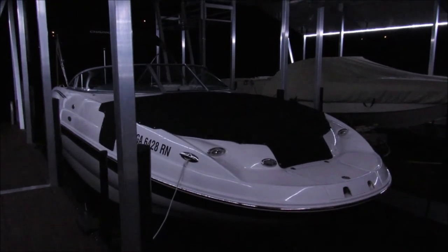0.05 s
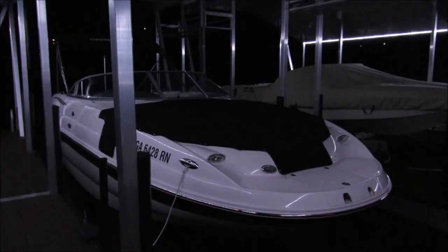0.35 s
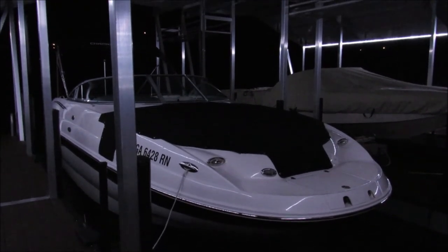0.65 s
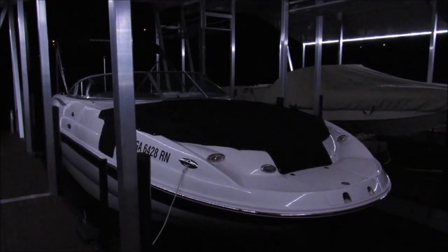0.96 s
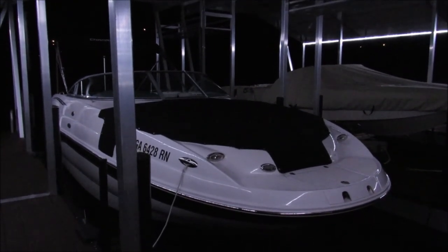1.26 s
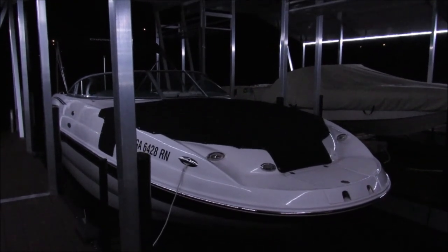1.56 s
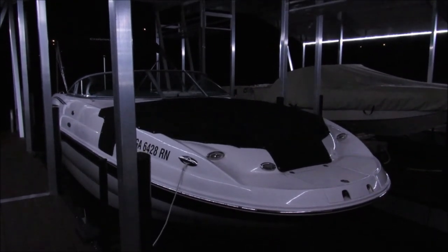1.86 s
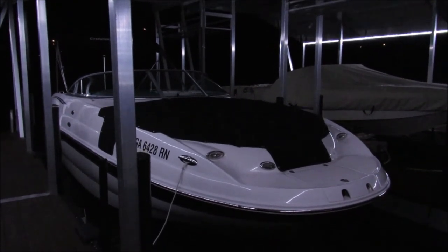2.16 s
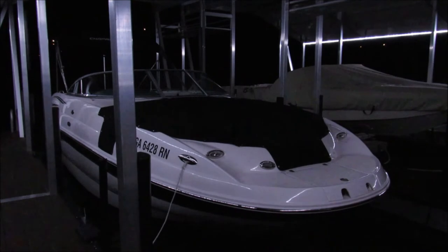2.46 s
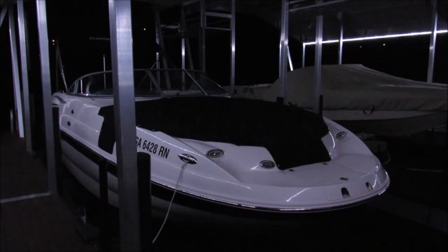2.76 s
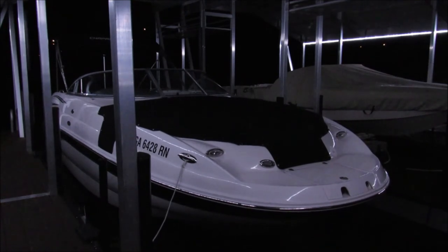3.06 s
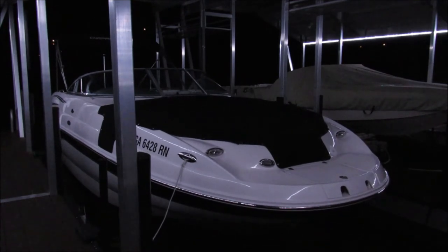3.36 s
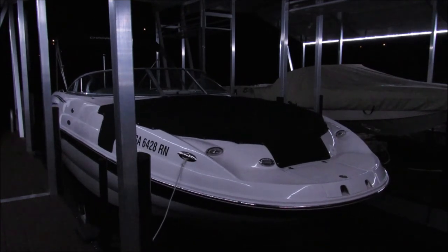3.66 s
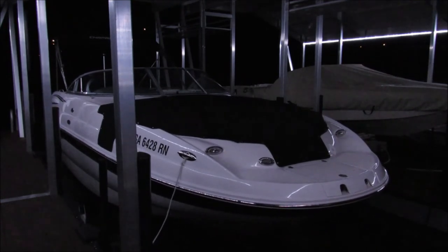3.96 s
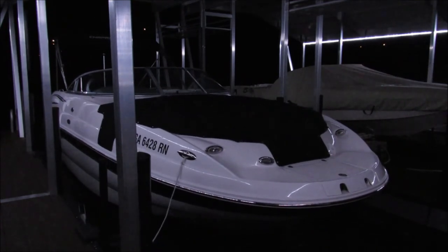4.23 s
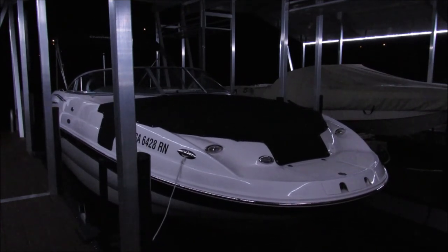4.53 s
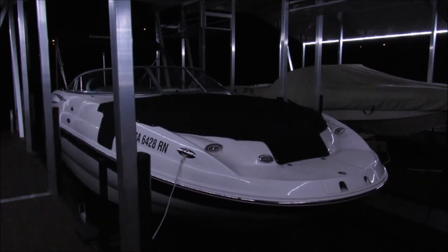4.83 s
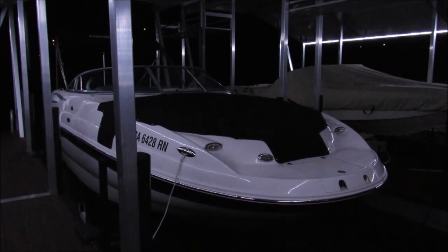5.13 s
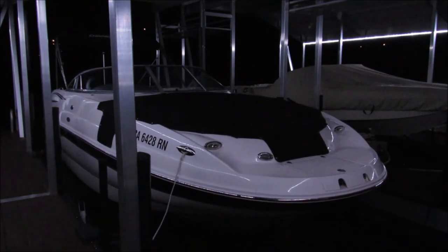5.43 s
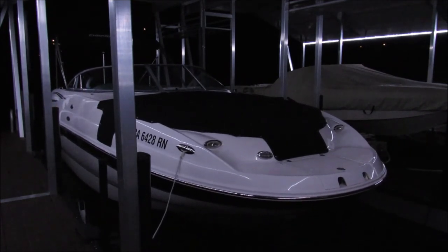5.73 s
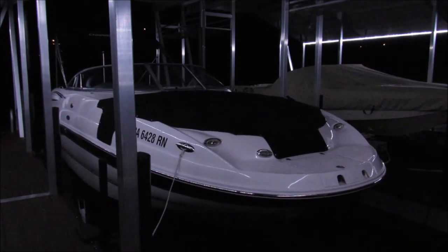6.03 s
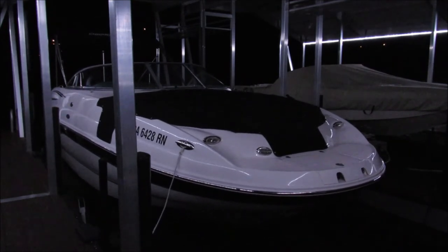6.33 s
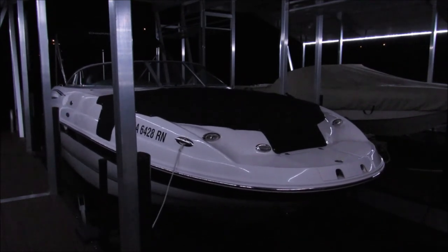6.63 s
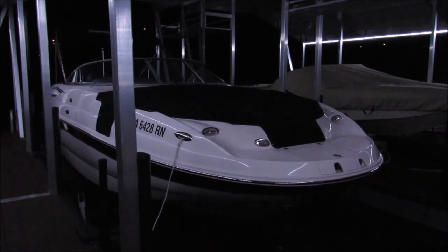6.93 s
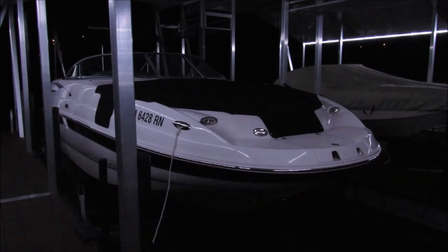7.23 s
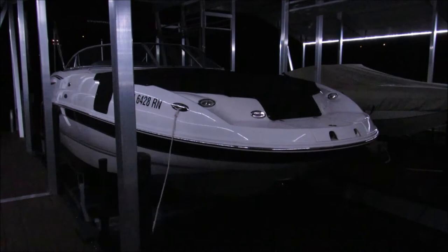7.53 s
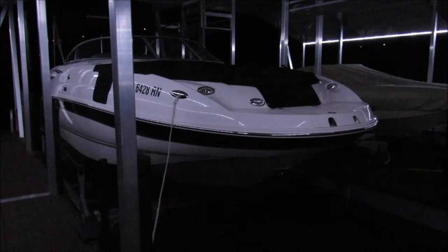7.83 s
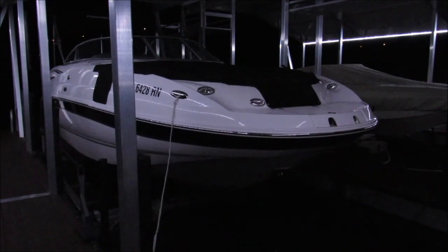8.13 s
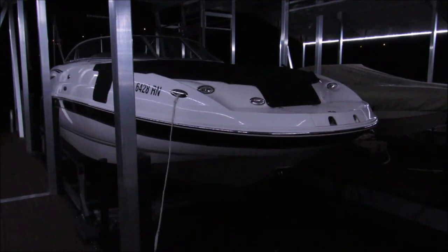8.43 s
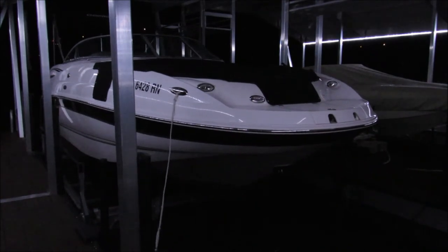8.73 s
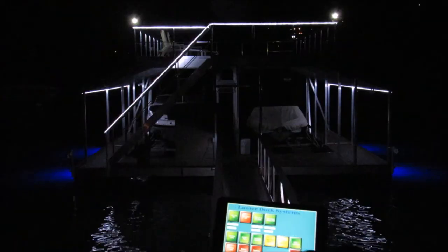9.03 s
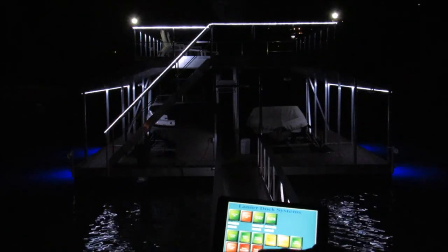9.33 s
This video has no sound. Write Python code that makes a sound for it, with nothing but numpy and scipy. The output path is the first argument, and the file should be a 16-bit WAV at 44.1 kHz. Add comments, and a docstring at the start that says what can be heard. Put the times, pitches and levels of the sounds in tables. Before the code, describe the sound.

Loud, steady rushing air and a fan whine from a boat lift blower, with late wind thumps and dripping water before a sudden stop.

```python
"""A loud drone and hiss of air, with a whining fan and a mains hum: an electric blower is filling the
tanks of a boat lift in a covered dock at night. The air drones in the pipe and hisses from the housing.
Wind starts to buffet the microphone, water slops off the rising hull, and the fan slows as the boat
comes up. Then the sound cuts off abruptly and only quiet lakeside air is left."""
import sys
import numpy as np
from scipy import signal
from scipy.fft import rfft, irfft, next_fast_len
from scipy.io import wavfile
from scipy.ndimage import map_coordinates

SR = 44100
rng = np.random.default_rng(int(sys.argv[2]) if len(sys.argv) > 2 else 0)


def generate_wav(signal):
    """Clip the signal to [-1, 1] and save it as 16-bit WAV at the path in sys.argv[1]."""
    frames = np.transpose(np.atleast_2d(signal))
    scaled = np.clip(frames, -1, 1) * 32767
    pcm = np.round(scaled).astype(np.int16)
    wavfile.write(sys.argv[1], SR, pcm)


N = 418068
RISE_AT_S, RISE_S = 7.68, .33  # the hull leaves the water: middle and time scale of its rise
TOP_HZ = 15760  # upper edge of the whole sound

# The blower stands a little to one side. Each row: frequency in Hz, left minus right level in dB.
BALANCE = [(60, -1), (110, -1), (200, -0.5), (380, 4.0), (700, 1.0), (1290, 1.0), (2380, -0.5),
           (4400, -1.0), (8120, -0.5), (15000, 0)]
# Each row: frequency in Hz, how far the left side runs ahead in radians.
LEFT_LEAD = [(400, -.3), (700, -0.23), (1900, -.36), (5000, -.28), (7000, -0.13), (8500, 0.056)]
def blower():
    """Air, fan and motor together, reaching left and right with slightly different level and timing."""
    def placement(f):
        gain = amp(stereo(0, along(BALANCE, f) / 2))
        return gain * np.exp(1j * stereo(0, along(LEFT_LEAD, f) / 2))
    return filtered(rushing_air() + fan_whine() + motor_hum(), placement)


# Low, middle and upper drone, then hiss. Each row: level in dB, drift in dB per second,
# change in dB as the hull rises, flutter in dB.
AIR_LEVELS = [(-34, -0.0333, 1, 0.64), (-31, -0.303, -2.6, 1), (-38.5, -0.0657, 0.5, 0.5),
              (-36, 0.0422, 0.6, 0.42)]
def rushing_air():
    """The drone and hiss flutter, and their levels shift as the tanks fill and the hull rises."""
    t, rise = np.arange(N) / SR, smooth_step(RISE_AT_S, RISE_S)
    *drone_db, hiss_db = [db + drift * t + change * rise + flutter * wobble(55)
                          for db, drift, change, flutter in AIR_LEVELS]
    return pipe_drone(drone_db) + housing_hiss(hiss_db)


# Swirling air before the pipe shapes it. Each row: frequency in Hz, relative level in dB.
DRONE_COLOUR = [(25, -36), (55, -30.5), (125, -33), (215, -16.5), (410, -18.5), (500, 0.5), (1100, -9.5),
                (1220, -13), (2200, -18.5), (2600, -21), (2850, -29), (5000, -91.5)]
# Where the air in the pipe and tanks rings. Each row: pitch in Hz, half width in Hz, boost in dB.
PIPE_RINGS = [(250, 14, 3), (355, 35, 5), (470, 16, 3), (523, 14, 3), (563, 13, 3), (672, 24, 8),
              (744, 32, 13), (816, 18, 11), (862, 30, 11.5), (965, 50, 12.5), (1048, 30, 11),
              (1108, 50, 15), (1350, 55, 8), (1432, 42, 10), (1500, 12, 6), (1635, 55, 4), (1858, 56, 15),
              (1984, 40, 10), (2145, 48, 8), (2222, 28, 7.5), (2416, 38, 7), (2550, 24, 6)]
# Narrow dips and ridges between the rings. Each row: pitch in Hz, half width in Hz, change in dB.
PIPE_RIPPLES = [(785, 5.7, 9), (894, 10, -3.5), (1095, 11, -5.5), (1195, 10, 0.5), (1580, 19, -2),
                (2044, 9.9, 6)]
def pipe_drone(levels_db, low_hz=795, upper_hz=1200, sway_db=.4, surge_db=.5, flutter_db=.34):
    """Swirling air makes the pipe ring; its low, middle and upper bands each surge on their own."""
    drone = airflow(DRONE_COLOUR, PIPE_RINGS + PIPE_RIPPLES, ripple_db=.7)
    low, body = (filtered(drone, lambda f: 1 / (1 + (f / hz) ** 40)) for hz in (low_hz, upper_hz))
    bands = zip(levels_db, (low, body - low, drone - body))
    drone = sum(amp(db + sway_db * wobble(4) + surge_db * wobble(16)) * unit(band) for db, band in bands)
    return drone * amp(flutter_db * wobble(70))


# The hiss before the housing shapes it. Each row: frequency in Hz, relative level in dB.
HISS_COLOUR = [(1500, -60), (2650, -13), (2800, -9), (3200, -4.5), (5300, 0), (7300, -3), (7800, -6),
               (9500, -5), (10400, -8.5), (15600, -9)]
# Where the housing rings. Each row: pitch in Hz, half width in Hz, boost in dB.
HOUSING_RINGS = [(2866, 45, 7), (3130, 90, 4), (3402, 26, 9), (3480, 32, 8.5), (3585, 110, 4.5),
                 (4330, 30, 2.5), (4575, 45, 6.5), (4791, 28, 4), (5050, 28, 5.5), (5290, 120, 4),
                 (5560, 60, 3), (5770, 45, 4.5), (6435, 48, 7), (6785, 58, 6), (7050, 75, 6), (7252, 48, 9),
                 (7526, 40, 6), (8760, 38, 4), (9950, 80, 3), (10643, 70, 5), (11160, 55, 4),
                 (11892, 48, 4), (12125, 42, 4.5), (12560, 70, 4), (14650, 60, 5), (14900, 70, 4.5)]
# Narrow dips in the hiss. Each row: pitch in Hz, half width in Hz, change in dB.
HISS_DIPS = [(2730, 32, -3), (2990, 43, -5.5), (3180, 18, -6), (10130, 130, -1), (12780, 70, 0)]
def housing_hiss(level_db, sway_db=.05):
    """Air rushes through the blower's housing, which rings at many high pitches."""
    hiss = airflow(HISS_COLOUR, HOUSING_RINGS + HISS_DIPS, ripple_db=1.4)
    return amp(level_db - sway_db * wobble(1.8)) * hiss


# How wide the dock's echoes spread the air. Each row: frequency in Hz, side minus mid level in dB.
ECHO_WIDTH = [(60, -7), (200, -2), (380, -6.5), (560, -18), (720, -20), (1080, -18.5), (1290, -11.5),
              (2380, -11.5), (4400, -10), (7200, -12.5), (9000, -19), (15000, -25)]
def airflow(colour, rings, ripple_db):
    """Noise of swirling air, shaped by its rings and dips and spread by the dock's echoes; rms 1."""
    grid = np.arange(0, SR / 2, 2)  # Hz
    db = along(colour, grid)
    db += sum(boost * np.exp(-((grid - hz) / width) ** 2) for hz, width, boost in rings)
    # echoes from roof and hulls comb the sound into fine ridges
    db += ripple_db * map_coordinates(rng.standard_normal(len(grid)), [grid / 40])
    noise = rng.standard_normal((2, N))
    mid, side = filtered(noise, lambda f: amp(np.interp(f, grid, db)) * amp([0 * f, along(ECHO_WIDTH, f)]))
    return unit(stereo(mid, side))


# The fan's tones. Each row: multiple of the blade rate, base level in dB, share of the swell,
# drift in dB per second.
FAN_TONES = [(1, -47, 0.13, -0.7), (4, -50.7, 0.045, -0.14), (6, -46, 1.2, 0), (7, -62, .7, 0)]
# How the whine swells and fades. Each row: time in seconds, relative level in dB.
WHINE_SWELL = [(0.0, -46), (0.91, -48), (1.14, -42.5), (2.45, -48), (3.57, -44), (5.08, -56), (5.45, -50),
               (5.6, -56), (6.52, -46.5), (6.74, -61), (6.82, -47.5), (7.31, -52), (7.36, -44), (7.63, -52),
               (7.68, -46.5), (8.48, -43), (8.55, -48), (8.9, -47)]
def fan_whine(blade_hz=1338.8, sag_hz_per_s=.43, rise_drop_hz=12.2, wander_hz=.7,
              boost_db=1, waver_db=1.43, spread_rad=.11):
    """Passing blades make the whine; its pitch sags as the tanks fill and drops as the hull rises."""
    t = np.arange(N) / SR
    hz = blade_hz - sag_hz_per_s * t - rise_drop_hz * smooth_step(RISE_AT_S, RISE_S)
    phase = 2 * np.pi * np.cumsum(hz + wander_hz * wobble(60)) / SR
    swell_db = np.interp(t, *np.transpose(WHINE_SWELL))
    swell_db -= swell_db.mean()
    tones = np.zeros((2, N))
    for multiple, db, share, drift in FAN_TONES:
        level_db = db + boost_db + share * swell_db + drift * t + waver_db * wobble(25)
        tones += amp(level_db) * np.sin(multiple * phase + stereo(0, spread_rad * wobble(2.9)))
    return np.sqrt(2) * tones


# The motor's tones. Each row: pitch in Hz, level in dB, the left side's own head start in radians.
HUM_TONES = [(480, -40.5, -.3), (1440, -50, 0)]
def motor_hum(waver_db=.2, drift_rad=.27):
    """The motor's magnets hum at multiples of the mains frequency, wavering in the air stream."""
    t = np.arange(N) / SR
    tones = np.zeros((2, N))
    for hz, db, lead in HUM_TONES:
        gain = amp(db - waver_db * wobble(14))
        phase = 2 * np.pi * hz * t + drift_rad * wobble(12)
        tones += gain * np.sin(phase + stereo(0, lead / 2)[:, None])
    return np.sqrt(2) * tones


# Gusts on the microphone. Each row: start in seconds, length in seconds, relative level in dB.
GUSTS = [(0, .02, -41), (.19, .04, -41), (5.64, .04, -39), (6.25, 0.022, -32), (6.65, 0.071, -41),
         (6.77, 0.19, -30.5), (7.18, 0.24, -33), (7.83, .2, -31.5), (8.33, .08, -33.5), (8.5, .05, -36)]
# The wind's rumble. Each row: frequency in Hz, relative level in dB.
WIND_COLOUR = [(25, -20.5), (60, -18), (120, -3), (220, 1), (350, 0), (550, -8), (900, -17), (1600, -42),
               (4000, -80)]
def wind(calm_db=-65, breeze_db=-49.5, sway_db=4, gust_trim_db=-1, lump_db=4, shared_db=-12):
    """A breeze freshens and gusts: its swirls push one microphone opening while they pull the other."""
    breeze = amp(calm_db) + amp(breeze_db) * smooth_step(at_s=5.16, over_s=.45)
    breeze *= amp(sway_db * wobble(14))
    gusts = amp(gust_trim_db) * swells(GUSTS, attack_s=.025, release_s=.035)
    swirls = rng.standard_normal((2, N)) * amp(lump_db * wobble(160))
    shared, opposed = filtered(swirls, lambda f: amp(along(WIND_COLOUR, f)))
    return np.hypot(breeze, gusts) * stereo(amp(shared_db) * unit(shared), unit(opposed))


# Thumps of wind. Each row: time in seconds, rough peak level in dB, pitch in Hz.
THUMPS = [(.203, -23, 400), (.208, -20, 400), (6.262, -21, 280), (6.655, -22, 500), (6.755, -15, 480),
          (6.805, -18, 330), (6.846, -19, 400), (6.935, -19, 400), (6.968, -11, 470), (7.185, -20, 330),
          (7.414, -19, 450), (7.846, -23, 300), (7.976, -16, 330), (8.005, -13, 380), (8.342, -19, 330),
          (8.403, -24, 200), (8.511, -20, 260)]
def wind_thumps(cycles=.72, shared=.22):
    """Single swirls hit the microphone, each a very short push and pull."""
    out = np.zeros((2, N))
    t = np.arange(-SR // 100, SR // 100) / SR
    for (s, db, hz), turn in zip(THUMPS, rng.random(len(THUMPS))):
        push = amp(db) * np.exp(-(t * hz / cycles) ** 2) * np.cos(2 * np.pi * (hz * t + turn))
        add(out, s + t[0], stereo(shared * push, push))
    return out


# Water pouring off the hull. Each row: start in seconds, length in seconds, relative level in dB.
SPILLS = [(7.38, 0.17, -44), (7.7, 0.11, -33), (7.95, 0.33, -45), (8.75, .15, -49)]
# Single drops. Each row: time in seconds, relative level in dB, pitch in Hz, left minus right in dB.
DROPS = [(7.707, -18, 1740, -2), (7.757, -24, 3360, -3), (7.811, -20, 1930, 2), (7.828, -24, 2010, -4),
         (7.945, -25, 1390, 0), (7.975, -25, 1750, 3), (8.100, -22.5, 3340, 0), (8.801, -26, 4350, 12)]
def hull_water(fizz_db=-1, gurgle_db=-5, drop_trim_db=-1):
    """Falling water makes bubbles ring: a fine fizz, a coarser gurgle and a few clear drops."""
    fizz = amp(fizz_db) * spray(SPILLS, centre_hz=6020, scatter=.398, cycles=5.7, count=10000)
    gurgle = amp(gurgle_db) * spray(SPILLS, centre_hz=1806, scatter=.14, cycles=3.7, count=1800)
    wash = (fizz + gurgle) * swells(SPILLS, attack_s=.025, release_s=.1)
    out = stereo(wash, .11 * np.roll(wash, SR // 300))  # a faint late copy adds width
    t = np.arange(SR // 20) / SR
    for s, db, hz, pan_db in DROPS:
        gains = amp(drop_trim_db + db + stereo(0, pan_db / 2))
        add(out, s, gains[:, None] * bubble(t, hz, cycles=12))
    return out


def spray(rows, centre_hz, scatter, cycles, count):
    """Many tiny bubbles of random size, from just before the first row's start onwards; rms 1."""
    when, pitch, size = rng.random(count), rng.standard_normal(count), rng.exponential(size=count)
    first = int(SR * rows[0][0]) - SR // 10
    starts = (first + when * (N - first)).astype(int)
    hz = np.clip(centre_hz * np.exp(scatter * pitch), 700, TOP_HZ)
    life = np.arange(SR // 100)
    bubbles = amp(1.6 * np.minimum(size, 4))[:, None] * bubble(life / SR, hz[:, None], cycles)
    fizz = np.bincount((starts[:, None] + life).ravel(), bubbles.ravel(), N)[:N]  # mix them in
    return fizz / fizz[first:].std()


def bubble(t, hz, cycles, climb=.021):
    """A fading ring whose pitch climbs as the bubble nears the surface."""
    age = t * hz / cycles
    ring = np.sin(2 * np.pi * hz * t * (1 + climb * np.minimum(age, 2)))
    return ring * np.exp(-age) * (1 - np.exp(-t * hz))


# When the low tone sounds. Each row: start in seconds, length in seconds, level in dB.
LOW_TONE_SPAN = [(2.3, 4.3, -58.5)]
def low_tone(centre_hz=320, wander_hz=5, waver_db=1):
    """One faint tone below the hum comes in, wanders in pitch and fades."""
    phase = 2 * np.pi * np.cumsum(centre_hz + wander_hz * wobble(1)) / SR
    gain = swells(LOW_TONE_SPAN, attack_s=.092, release_s=1) * amp(waver_db * wobble(9.3))
    return np.sqrt(2) * gain * np.sin(phase)


# The open air by the lake. Each row: frequency in Hz, relative level in dB.
LAKE_COLOUR = [(15, -34.5), (25, -15), (75, -8), (169, -8), (246, -9), (359, -8.5), (421, -17), (582, -11),
               (684, -34), (848, -20), (1340, -20.5), (2120, -33), (2300, -31), (3340, -35), (15500, -41.5)]
def lake_air(start_s=8.951, level_db=-48, hush_at_s=9.43, hush_db=-57.5):
    """A soft rush, different in each ear, that steps down to a hush at the very end."""
    t = np.arange(N) / SR
    gain = (t > start_s) * amp(np.where(t < hush_at_s, level_db, hush_db))
    return gain * unit(filtered(rng.standard_normal((2, N)), lambda f: amp(along(LAKE_COLOUR, f))))


# Little waves. Each row: start in seconds, length in seconds, level in dB.
WAVES = [(9.03, 0.11, -63), (9.27, .015, -62), (9.36, 0.054, -58), (9.455, .02, -58)]
def lapping():
    """Each little wave at the shore is a brief swell of bubbles."""
    bubbles = spray(WAVES, centre_hz=1600, scatter=.224, cycles=6, count=220)
    return swells(WAVES, attack_s=.015, release_s=.03) * bubbles


# Faint ticks by the lake. Each row: time in seconds, peak level in dB, pitch in Hz.
TICKS = [(9.079, -42, 1000), (9.279, -43, 1500), (9.367, -39, 2600)]
def ticks(decay_s=.0016):
    """Each tick is a tiny burst of noise around its pitch."""
    out = np.zeros((2, N))
    t = np.arange(SR // 20) / SR
    for s, db, hz in TICKS:
        band = signal.butter(1, [hz / 2, hz * 2], "band", fs=SR)
        tick = signal.lfilter(*band, rng.standard_normal((2, len(t))) * np.exp(-t / decay_s))
        add(out, s, amp(db) * tick / np.abs(tick).max())
    return out


def amp(db):
    """Decibels to gain."""
    return 10 ** (np.asarray(db) / 20)


def unit(x):
    """Scale to an average strength (rms) of 1."""
    return x / np.sqrt(np.mean(x ** 2) + 1e-20)


def along(points, hz):
    """Read between (Hz, value) points on a log frequency axis."""
    f, values = np.transpose(points)
    return np.interp(np.log(hz + 1), np.log(np.sort(f) + 1), values)


def wobble(rate):
    """A smooth random curve through `rate` points a second."""
    knots = rng.standard_normal(4096)
    coarse = np.arange(0, N + 64, 64)
    return np.interp(np.arange(N), coarse, map_coordinates(knots, [coarse * rate / SR], mode="wrap"))


def smooth_step(at_s, over_s):
    """A smooth step from 0 to 1, halfway up at at_s."""
    return .5 + .5 * np.tanh((np.arange(N) / SR - at_s) / (2 * over_s))


def swells(rows, attack_s, release_s):
    """Gain of (start, length, dB) events that each build up, hold and die away."""
    t = np.arange(N) / SR
    power = np.zeros(N)
    for s, length, db in rows:
        fade = np.maximum((s - t) / attack_s, (t - s - length) / release_s)
        power += amp(2 * db) * np.exp(-2 * np.clip(fade, 0, 20))
    return np.sqrt(power)


def filtered(x, response):
    """Multiply each frequency in x by response(Hz)."""
    size = next_fast_len(N + SR // 4, True)
    return irfft(rfft(x, size) * response(np.fft.rfftfreq(size, 1 / SR)), size)[..., :N]


def stereo(mid, side):
    """Left and right from their shared (mid) and opposed (side) parts."""
    return np.array([mid + side, mid - side])


def add(track, s, sound):
    """Mix a short sound in at s seconds."""
    part = track[..., round(s * SR):][..., :sound.shape[-1]]
    part += sound[..., :part.shape[-1]]


def scene(cut_s=8.913, tail_db=-28, tail_s=.011):
    """The dock until the abrupt cut and its faint, brief tail, then the quiet shore."""
    dock = blower() + low_tone() + hull_water() + wind() + wind_thumps()
    since_cut = np.maximum(np.arange(N) / SR - cut_s, 0)
    dock *= np.where(since_cut > 0, amp(tail_db) * np.exp(-since_cut / tail_s), 1)
    return dock + lake_air() + lapping() + ticks()


def record(dry):
    """Remove the very highest treble, above TOP_HZ."""
    return filtered(dry, lambda f: np.clip((TOP_HZ - f) / 100 + .5, 0, 1))


dry = scene()
out = record(dry)
generate_wav(out)
```